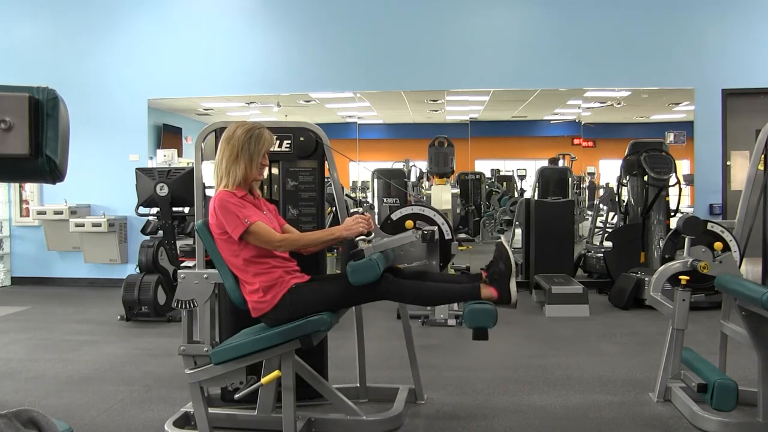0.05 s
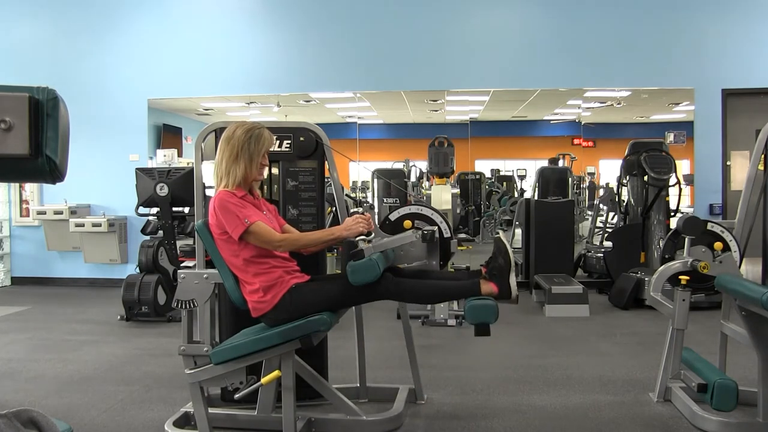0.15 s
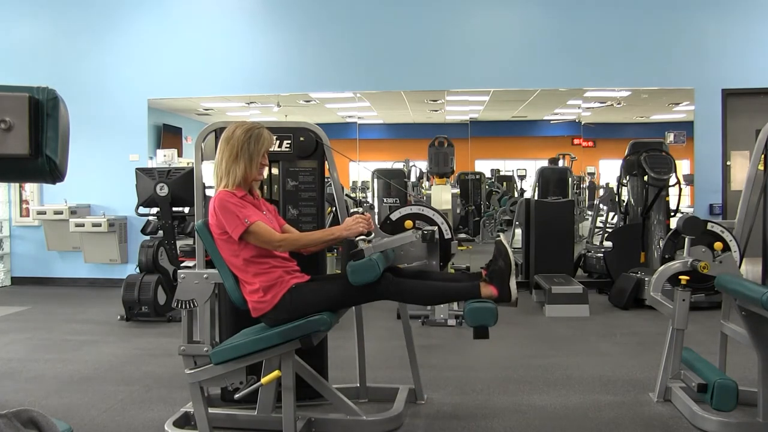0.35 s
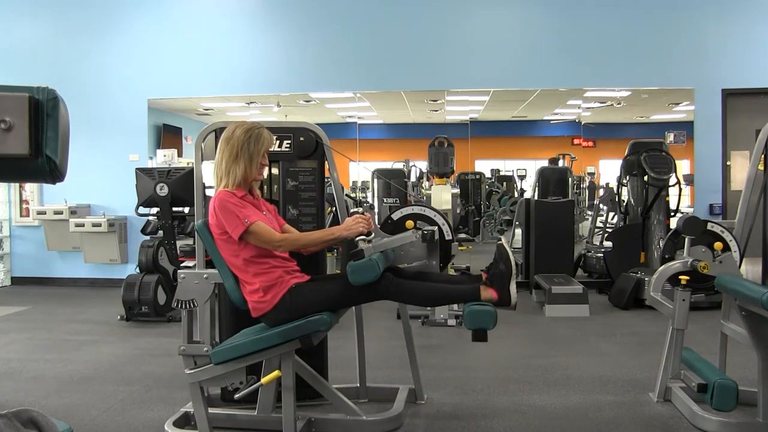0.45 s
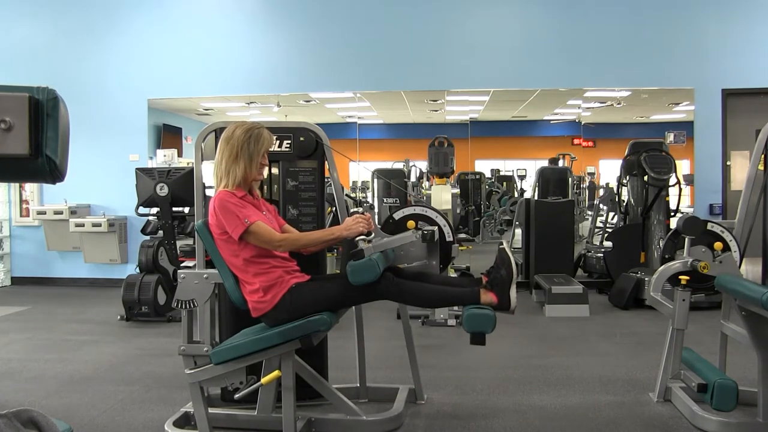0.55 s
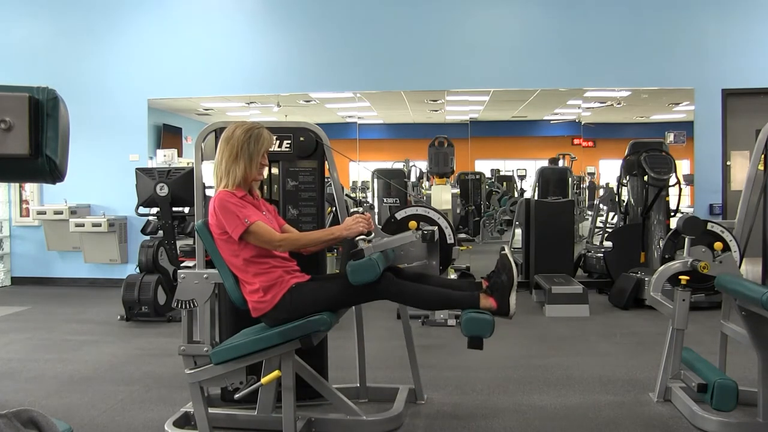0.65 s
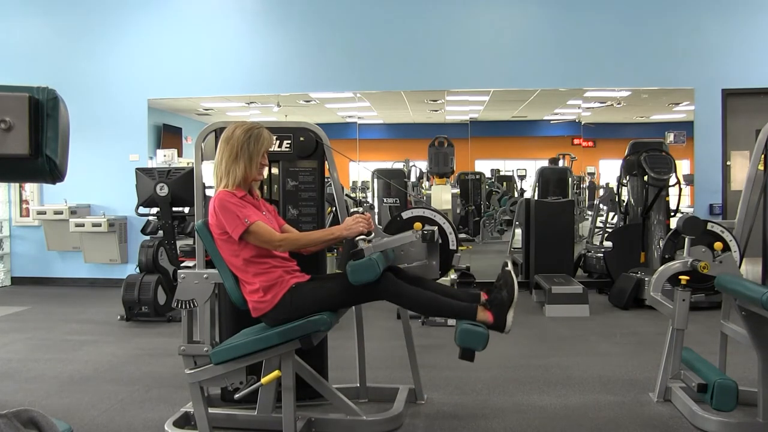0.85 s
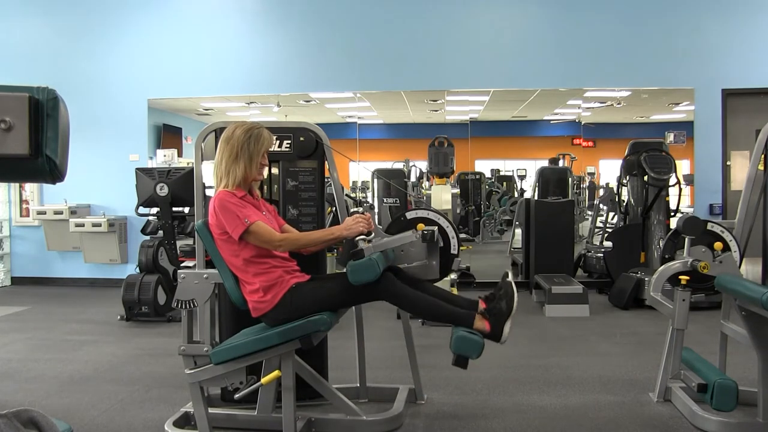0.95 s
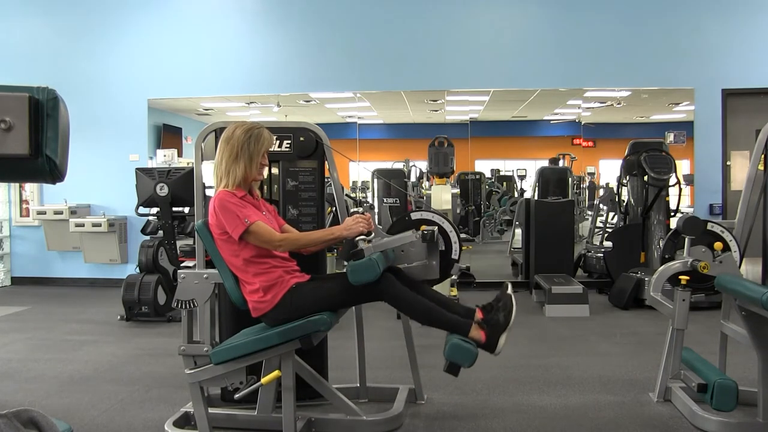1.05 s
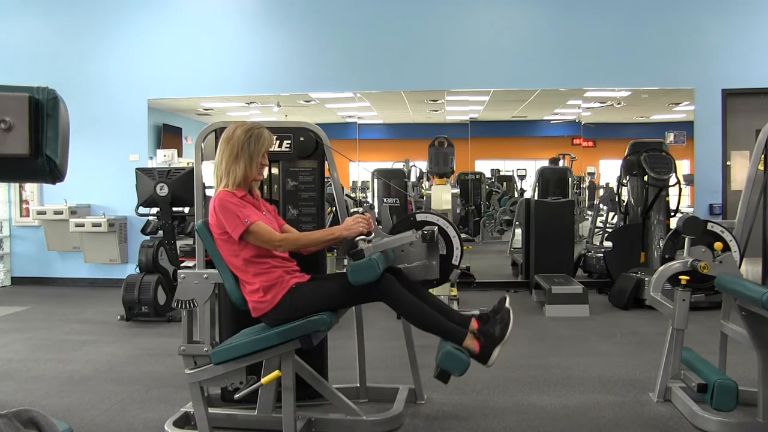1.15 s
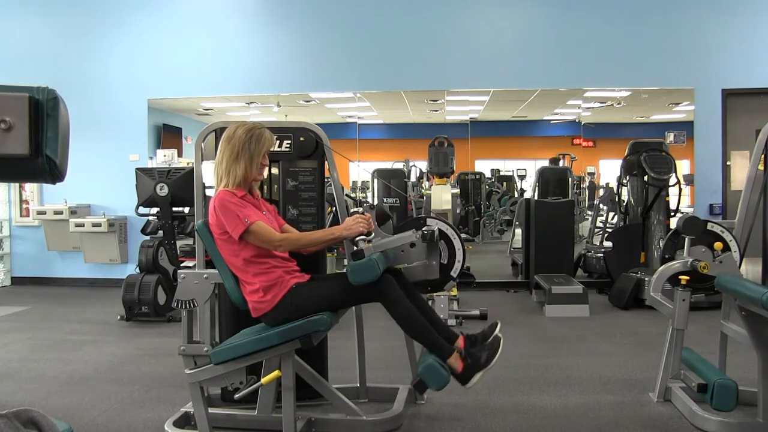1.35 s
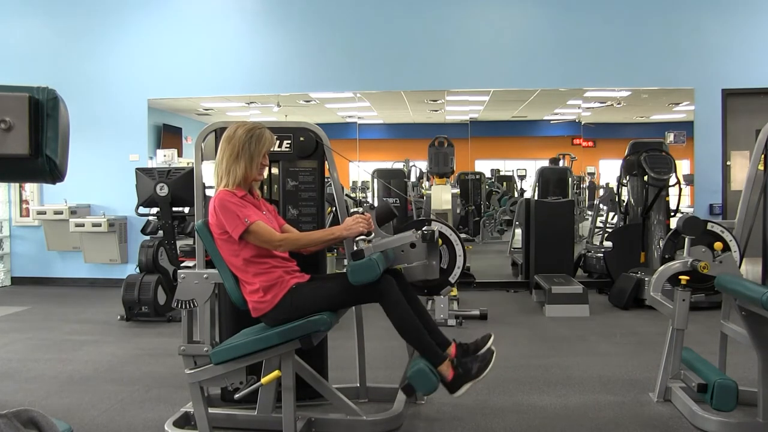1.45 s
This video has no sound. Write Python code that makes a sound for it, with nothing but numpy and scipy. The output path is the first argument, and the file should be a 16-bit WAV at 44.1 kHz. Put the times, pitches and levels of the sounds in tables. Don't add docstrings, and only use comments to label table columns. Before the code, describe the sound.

Weight machine plates clank down twice with a metallic rattle in a large humming gym

```python
import sys
import numpy as np
from scipy import signal
from scipy.io import wavfile
from scipy.ndimage import uniform_filter1d

SR = 44100
rng = np.random.default_rng(int(sys.argv[2]) if len(sys.argv) > 2 else 0)


def volts_from_db(level):
    exponent = np.asarray(level, float) / 20
    return 10 ** exponent


def generate_wav(sig):
    pcm = np.round(np.clip(np.atleast_2d(sig).T, -1, 1) * 32767).astype(np.int16)
    wavfile.write(sys.argv[1], SR, pcm)


N = 66150
T = np.arange(N) / SR


def band(x, hz, width):
    q = max(hz / width, 0.3)
    return signal.lfilter(*signal.iirpeak(min(hz, 0.44 * SR), q, fs=SR), x)


def unit(x):
    return x / np.sqrt(np.mean(x ** 2))


def noise_band(hz, width):
    once = band(rng.standard_normal(N), hz, width)
    return unit(band(once, hz, width))


def walk(rate):
    hold = int(SR / rate)
    steps = np.repeat(rng.standard_normal(N // hold + 1), hold)
    smooth = uniform_filter1d(uniform_filter1d(steps, hold), hold)
    return 1.3 * smooth[:N]


def fade(start, t60, rise):
    u = np.maximum(T - start, 0)
    return (1 - np.exp(-u / rise)) * volts_from_db(-60 * u / t60)


def hall():
    # frequency in Hz, level in dB per Hz.
    spectrum = [(25, -4), (60, -3.5), (140, -5.5), (300, -11), (560, -24), (1400, -32.5), (3800, -33.5),
                (15500, -47)]
    # centre in Hz, width in Hz, level in dB.
    whirr_bands = [(2114, 81, -55), (2900, 460, -51.5), (402, 140, -49.5)]
    hall_db, swell_db, flicker_db = -33, 0.4, 2
    hum_hz, hum_db, hum_wobble_db, whirr_wobble_db = 120.5, -36, 2.2, 3
    air, swell = 0, walk(6.8)
    table_hz, table_db = np.transpose(spectrum)
    for hz in 25 * 2 ** np.arange(0, 9.4, 0.5):
        db = np.interp(np.log(hz), np.log(table_hz), table_db)
        db = db + 10 * np.log10(hz)
        db = db + swell_db * swell + flicker_db * walk(11.97)
        air = air + volts_from_db(db) * noise_band(hz, hz / 2)
    hum_level = volts_from_db(hum_db + hum_wobble_db * walk(12.76))
    hum = hum_level * np.sin(2 * np.pi * hum_hz * T + 0.5 * walk(8.5))
    whirr = 0
    for hz, width, db in whirr_bands:
        whirr = whirr + volts_from_db(db + whirr_wobble_db * walk(16.0)) * noise_band(hz, width)
    return volts_from_db(hall_db) * unit(air) + hum + whirr


def rumble():
    # centre in Hz, width in Hz, level in dB.
    rolling_bands = [(46, 38, -34.5), (212, 27, -38), (114, 49, -33.5), (4400, 5700, -42),
                     (2900, 1200, -43.5)]
    end_s, fade_s = 0.21, 0.15
    rolling = sum(volts_from_db(db) * noise_band(hz, width) for hz, width, db in rolling_bands)
    return rolling * np.exp(-(np.maximum(T - end_s, 0) / fade_s) ** 2)


def room(x):
    # band centre in Hz, t60 in seconds.
    decays = [(250, 0.99), (500, 0.67), (1200, 0.41), (3000, 0.85), (6500, 1), (13000, 0.17)]
    room_db, gap_s, build_up_s = -16, 0.0049, 0.0031
    tail = 0
    for hz, t60 in decays:
        noise = unit(band(rng.standard_normal(N), hz, hz))
        tail = tail + np.sqrt(hz) * fade(gap_s, t60, build_up_s) * noise
    tail = tail / np.sqrt(np.sum(tail ** 2)) * 2
    return volts_from_db(room_db) * signal.fftconvolve(x, tail)[:N]


def ticks():
    # start in seconds, centre in Hz, width in Hz, level in dB, t60 in seconds.
    cracks = [(0.0562, 4040, 4800, -28, 0.071), (0.153, 1570, 2050, -33, 0.094),
              (0.206, 1430, 2520, -33, 0.072), (1.36, 4250, 200, -50.5, .2),
              (0.253, 9100, 8000, -33.5, 0.057), (.354, 14100, 600, -41.5, 0.21),
              (0.354, 10100, 7000, -39, 0.2), (.378, 9500, 6030, -43, 0.077),
              (0.492, 7300, 6000, -37, 0.079), (0.575, 6900, 3950, -40, 0.051),
              (.68, 3000, 895, -38.5, 0.11), (0.718, 3000, 686, -31, 0.17),
              (0.721, 5370, 1540, -40.5, 0.084), (.862, 2570, 1310, -35, 0.14),
              (0.836, 4900, 5800, -50, 0.14), (0.948, 2330, 488, -58, 0.058),
              (1.102, 1530, 1020, -36, 0.036), (1.168, 2900, 700, -38.5, 0.15),
              (1.194, 2420, 4050, -39.5, 0.12), (1.246, 2920, 2490, -41.5, .12),
              (1.346, 3000, 4030, -45, 0.37), (1.435, 2060, 2210, -44, 1), (1.432, 6850, 8900, -49, 0.22),
              (.056, 950, 700, -34.5, 0.071)]
    # start in seconds, centre in Hz, width in Hz, level in dB,
    # t60 in seconds.
    shudders = [
        (1.345, 2820, 150, -54.5, 0.96),
        (.46, 307, 220, -29.5, 0.73),
        (1.19, 360, 230, -36.5, 0.35),
        (0.947, 2290, 210, -43, 0.1),
        (0.83, 2230, 200, -51, 0.15),
        (0.68, 474, 31, -43, 0.76),
        (1.405, 2090, 110, -49.5, 0.9),
    ]
    out = 0
    for start, hz, width, db, t60 in cracks + shudders:
        once = band(rng.standard_normal(N), hz, width)
        grain = unit(band(once, hz, 0.98 * width))
        out = out + volts_from_db(db) * fade(start, t60, 0.0005) * grain
    return out


def knocks():
    # start in seconds, frequency in Hz, peak in dB, t60 in seconds, push (rise
    # time) in seconds. First the knocks on frame tubes and pads.
    thuds = [(.238, 328, 4, 0.038, 0.0057), (.275, 322, 0, 0.065, 0.0027), (.284, 454, 3.5, 0.047, 0.0043),
             (.352, 339.8, -8.5, 0.21, 0.0025), (.360, 414.6, 3, 0.053, 0.00394),
             (.402, 449.4, -3, 0.15, 0.002), (.277, 563, -13.5, 0.19, 0.0015),
             (.365, 582, -16.5, 0.26, 0.0099), (0.548, 290, -27.5, 0.19, 0.015),
             (.43, 136.6, -15, 0.14, 0.0087), (.153, 880, -21, 0.016, 0.0015),
             (.688, 822, -30, 0.34, 0.0033), (.718, 748, -30.5, 0.23, 0.0012),
             (0.948, 121, -19.5, 0.11, 0.0048), (.95, 233.6, -25.5, 0.088, 0.004),
             (.98, 98, -28, 0.14, 0.0023), (1.101, 820, -32.5, 0.15, 0.001),
             (1.188, 770, -34, 0.19, 0.0025), (1.345, 145.5, -23.5, 0.17, 0.0086),
             (1.366, 109, -22, 0.086, 0.0033), (1.402, 295, -22, 0.14, 0.005),
             (1.41, 794, -29, 0.087, 0.0049), (1.468, 241, -32.5, 0.19, 0.013)]
    plate_rings = [(.352, 1240, -11, 0.28, 0.009), (.352, 1290, -14, 0.19, .006),
                   (.372, 2032, -14, 0.15, 0.0064), (0.43, 280, -20, 0.19, 0.011),
                   (.276, 1300, -15, 0.12, 0.0044), (0.23, 530, -20, 0.047, 0.0072),
                   (.37, 970, -26, 0.16, 0.013), (.278, 1625, -14.5, .14, 0.0055),
                   (.278, 770, -17, 0.16, 0.0035), (.28, 2160, -15.5, .1, 0.0032),
                   (.285, 922, -22.5, .25, 0.0069), (.282, 1765, -16.5, .12, .005),
                   (.355, 750, -15, 0.18, 0.01), (.358, 2150, -19, .09, .005), (.356, 2725, -20, .1, .004),
                   (.378, 1230, -15.5, 0.13, .004), (.376, 1435, -15, .14, .004),
                   (0.29, 2300, -26.5, .1, 0.0037), (0.3234, 345, -21, 0.21, .01),
                   (.325, 580, -21, 0.17, 0.0045), (.485, 420, -29, 0.23, .01),
                   (.49, 730, -31.5, 0.19, 0.0053), (0.41, 2007, -36, .12, .004),
                   (.575, 345, -27.5, .2, 0.0076), (0.61, 252, -29, 0.24, .01),
                   (.43, 441, -24, 0.43, 0.012), (.718, 1640, -35.5, 0.1, 0.0039)]
    small_tones = [(.862, 2130, -44.5, 0.13, 0.0034), (.862, 3080, -44, 0.085, 0.0018),
                   (.234, 557, -23.5, 0.1, 0.0027), (.188, 2794, -34, .06, .003), (.21, 2980, -36, .1, 0.0043),
                   (.167, 841, -31.5, 0.09, 0.0033), (.208, 840, -32, .05, 0.0019),
                   (1.165, 3010, -39, 0.068, .003), (1.187, 2840, -38, 0.16, .004), (1.19, 2086, -44, .2, .004),
                   (1.24, 2105, -46, .3, .006), (1.243, 3450, -41, .08, .003), (1.255, 3705, -49, .12, .004),
                   (1.362, 4216, -46, .2, .006), (1.365, 2887, -46, 0.11, .004), (1.34, 2860, -50, .12, .003),
                   (1.345, 1252, -48, 0.41, 0.0051), (1.37, 3710, -51, .15, .004), (1.41, 2870, -47, .25, .006),
                   (1.448, 6127, -48, .1, 0.0054), (1.465, 2870, -44, 0.33, .006),
                   (1.497, 950, -34, .05, 0.0016),
                   (.251, 5090, -23, .09, .003), (.536, 3085, -27, .12, .004), (.512, 3050, -30, .08, .003),
             (.556, 3110, -31, .07, .002), (.719, 2930, -33, .16, .003), (.719, 3200, -34, .12, .003),
             (.883, 2570, -38, .07, .006), (.868, 2500, -41, .1, .004), (.398, 295, -20, .12, .006),
             (1.115, 785, -41, .35, .01), (.231, 820, -24, .07, .003)]
    rough = 1 + 0.15 * walk(150)
    out = 0
    for start, hz, db, t60, push in thuds + plate_rings + small_tones:
        tone = np.sin(2 * np.pi * hz * (T - start))
        out = out + volts_from_db(db) * fade(start, t60, push) * tone
    return rough * out


def clanks():
    # start in seconds, chatter length in seconds, first-set level in dB,
    # second-set level in dB, sizzle level in dB.
    landings = [
        (0.235, 0.024, -33.5, -33, -35.5),
        (0.272, 0.026, -20, -26, -36.5),
        (0.281, 0.022, -22, -38, -45),
        (0.35, 0.022, -17, -24, -42),
        (0.372, 0.012, -18, -10, -23),
        (0.386, .028, -56, -18.5, -30),
        (0.715, 0.02, -39.5, -44, -61),
        (1.162, 0.029, -50.5, -49, -79),
        (1.184, 0.037, -48.5, -47.5, -53),
        (1.239, 0.012, -57, -49, -52),
    ]
    # frequency in Hz, width in Hz, level in dB.
    first_set = [(750, 180, 0.5), (983, 6.3, -4.5), (1060, 67, -4.5), (1427, 42, 0.5), (1633, 42, 2.5),
                 (1846, 94, 2.5), (2108, 27, -11), (2520, 100, -3.5), (2870, 29, -6.5), (3000, 64, -3),
                 (3216, 12, -8), (3660, 9.8, -5), (4260, 35, -47), (5000, 31, -34)]
    # frequency in Hz, width in Hz, level in dB.
    second_set = [(806, 17, -9.5), (995, 10, -2), (1248, 30, -2), (1643, 143, 1.5), (2030, 57, -3),
                  (2520, 58, -6), (2735, 95, 0.5), (3102, 28, 1.5), (3180, 18, -6), (3454, 93, -2),
                  (4093, 160, -6.5), (4630, 35, -12), (4900, 210, -11.5), (5660, 400, -4.5)]
    chatter_per_s, chatter_db, ring_share, plate_top_hz = 5000, 2.5, 1.0, 4180
    sizzle_hz, sizzle_width_hz = 5500, 1730

    strikes = rng.random(N) < chatter_per_s / SR
    strength = volts_from_db(chatter_db * rng.exponential(size=N))
    hits = unit(strikes * strength * rng.choice([-1, 1], N))
    drive = np.zeros((3, N))
    for start, length, first_db, second_db, sizzle_db in landings:
        u = (T - start) / length
        burst = np.clip(u / 0.065, 0, 1) * np.exp(-np.maximum(u, 0) ** 2)
        levels = volts_from_db([first_db, second_db, sizzle_db])
        drive += np.outer(levels, burst) * hits

    out = 0
    for push, plate in zip(drive, (first_set, second_set)):
        for k, (hz, width, db) in enumerate(plate):
            wide = ring_share * width + 45
            gain = volts_from_db(db + 5.5) * np.sqrt(SR / (20 * wide))
            out = out + (-1) ** k * gain * band(push, hz, wide)
        out = out + volts_from_db(6) * band(push, 1200, 2900)
    low_pass = signal.butter(2, plate_top_hz, fs=SR, output="sos")
    dull = signal.sosfilt(low_pass, out)
    return dull + 3 * band(drive[2], sizzle_hz, sizzle_width_hz)


def duck():
    start_s, drop_db, drop_time_s, recover_db_per_s = 0.39, -5, 0.079, 1.1
    u = np.maximum(T - start_s, 0)
    return volts_from_db(drop_db * (1 - np.exp(-u / drop_time_s)) + recover_db_per_s * u)


def scene():
    frame_room_db = -4
    plates, frame, small = clanks(), knocks(), ticks()
    wet = room(plates + small + volts_from_db(frame_room_db) * frame)
    machine = plates + frame + small + wet
    return (machine / duck() + hall() + rumble())[None]


def band_limit(x):
    return signal.sosfilt(signal.butter(12, 15890, fs=SR, output="sos"), x)


def record(dry):
    ceiling, top_hz = 1.15, 15800
    soft = ceiling * np.tanh(dry * duck() / ceiling)
    top_cut = signal.ellip(8, 0.2, 60, top_hz, fs=SR, output="sos")
    return band_limit(signal.sosfilt(top_cut, soft))


dry = scene()
out = record(dry)
generate_wav(out)
```